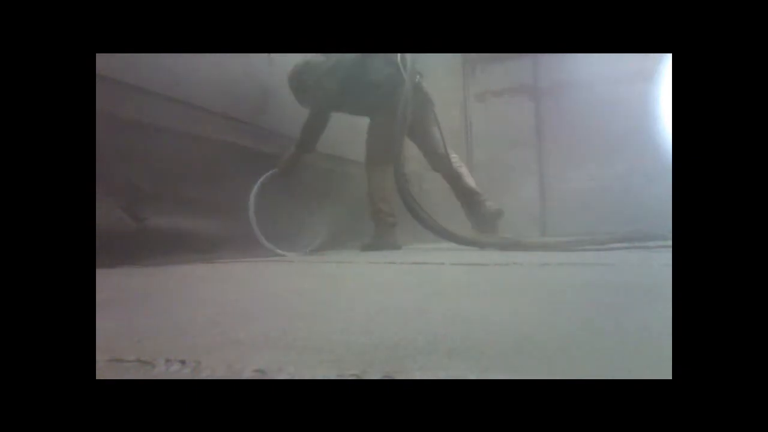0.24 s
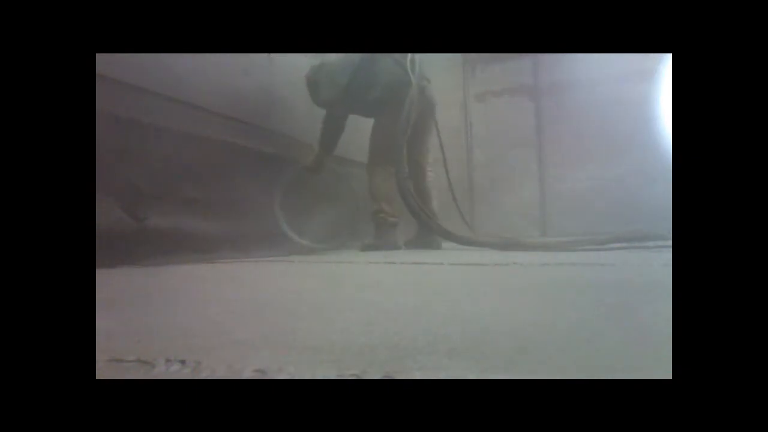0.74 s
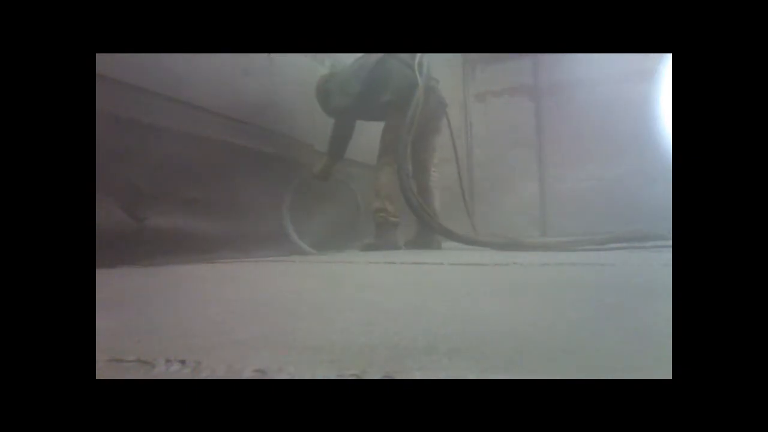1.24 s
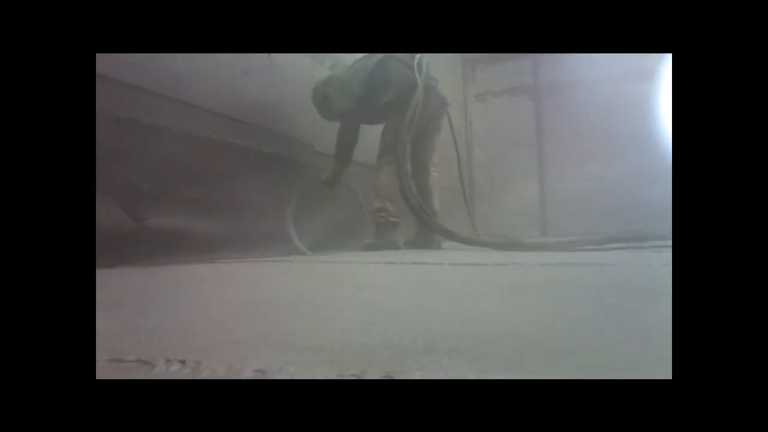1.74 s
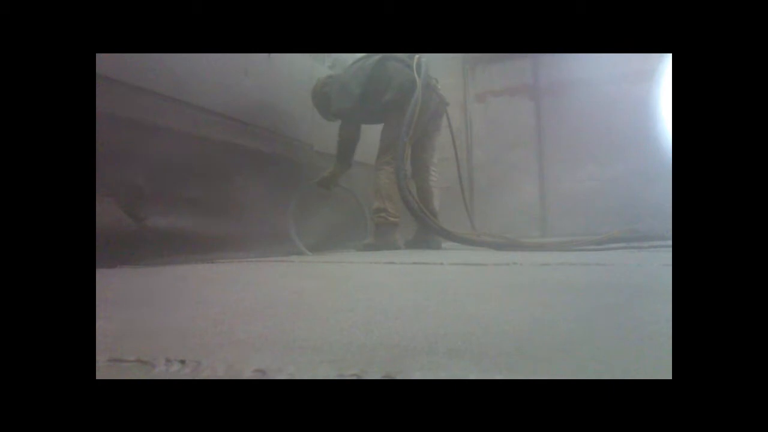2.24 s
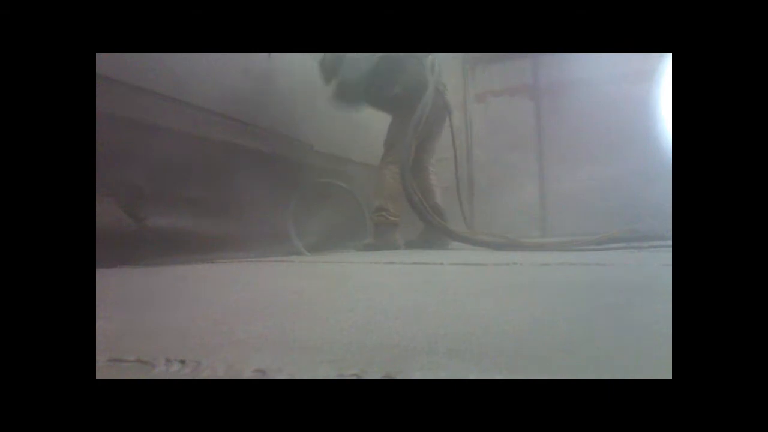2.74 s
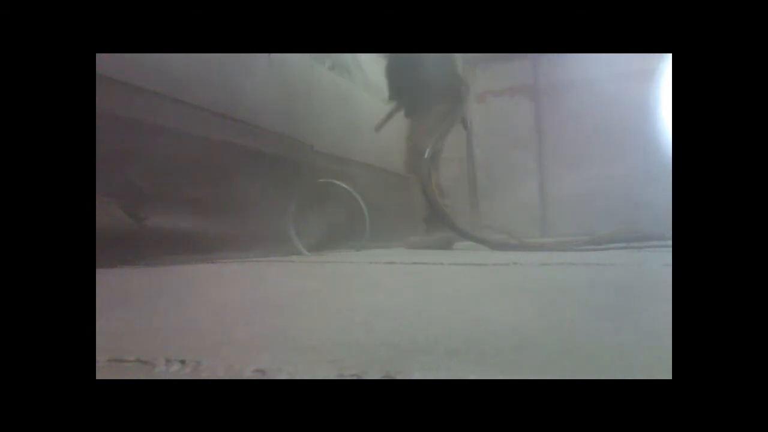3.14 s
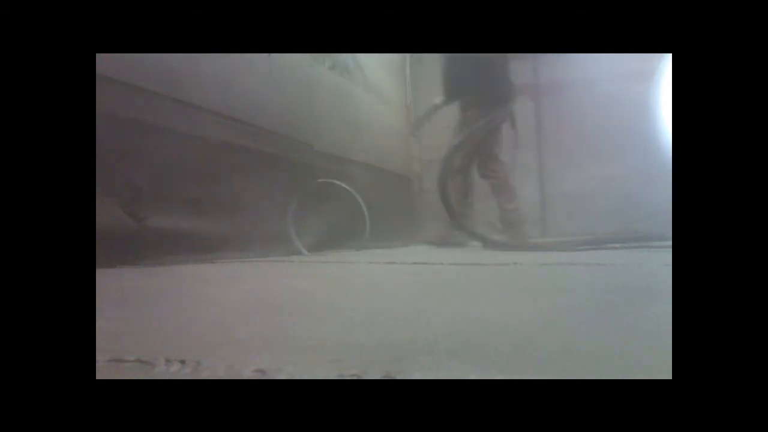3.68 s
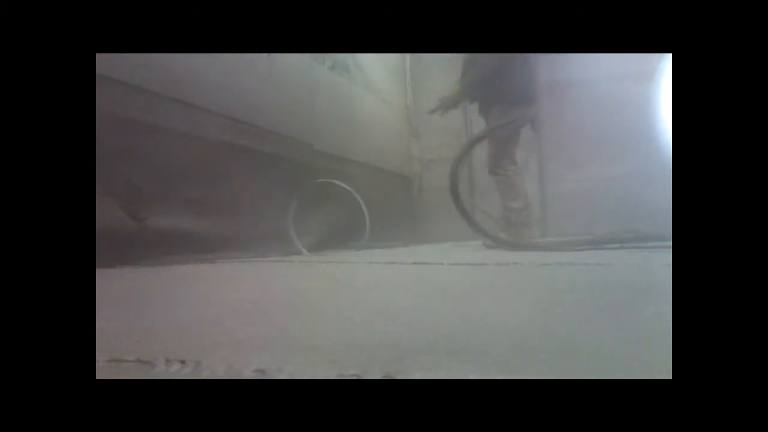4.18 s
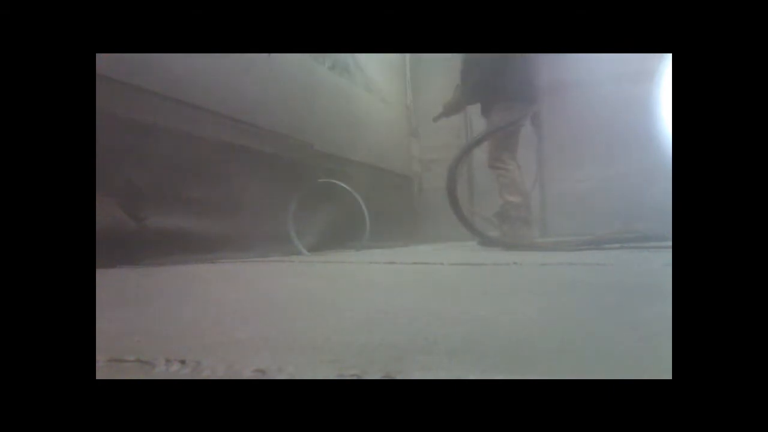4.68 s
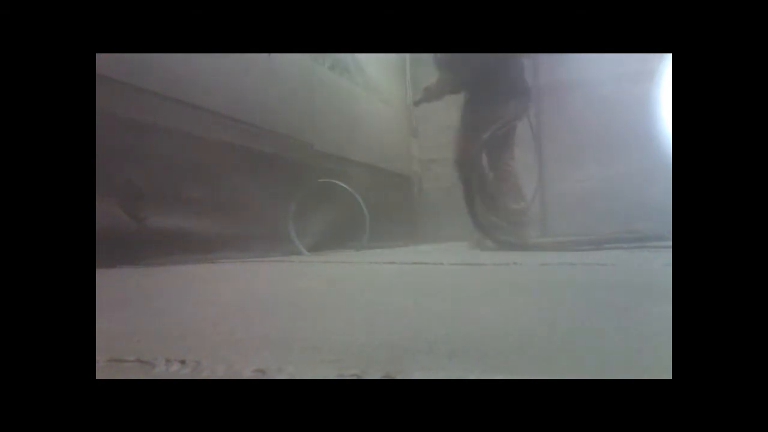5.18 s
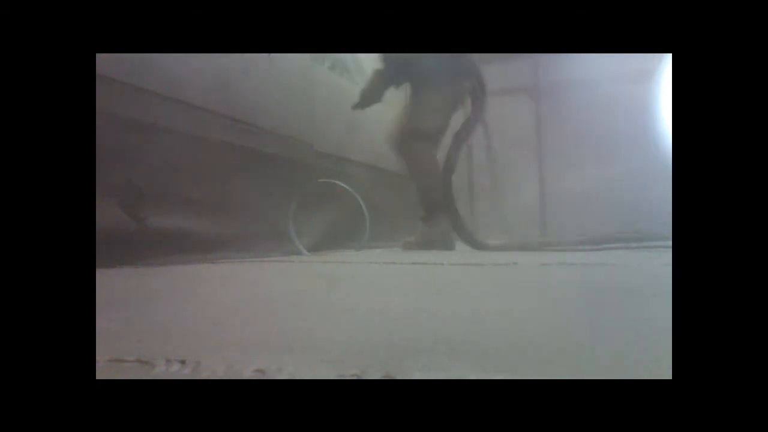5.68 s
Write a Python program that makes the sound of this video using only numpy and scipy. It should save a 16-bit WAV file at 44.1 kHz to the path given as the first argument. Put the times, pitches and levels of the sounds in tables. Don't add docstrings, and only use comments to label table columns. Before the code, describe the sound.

A loud abrasive air jet sizzles against a steel hoop, then turns away and dulls under a fluttering, droning, low blower roar.

```python
import sys
import numpy as np
from scipy import signal
from scipy.fft import rfft, irfft
from scipy.io import wavfile
from scipy.ndimage import uniform_filter1d

SR = 44100
rng = np.random.default_rng(int(sys.argv[2]) if len(sys.argv) > 2 else 0)


def makeup_ratio(level_db):
    decades = np.asarray(level_db, float) / 20
    return 10 ** decades


def store_wav(level_fs):
    pcm = np.round(np.clip(np.atleast_2d(level_fs), -1, 1) * 32767)
    wavfile.write(sys.argv[1], SR, pcm.T.astype(np.int16))


N = 261072

BLOWER_DB = -23.5


def evened(x):
    return x / np.sqrt(np.mean(x ** 2) + 1e-20)


def read(points, hz):
    f, value = np.transpose(points)
    return np.interp(np.log(hz + 1), np.log(f + 1), value)


def follow(rows, t):
    s, *columns = np.transpose(rows)
    return [np.interp(t, s, c) for c in columns]


def wander(rate_hz, t):
    coarse = t[::32]
    drift = 0
    for f in rate_hz * np.geomspace(.05, 1, 24):
        drift = drift + np.sin(2 * np.pi * (f * coarse + rng.random())) / np.sqrt(f)
    return evened(np.interp(t, coarse, drift))


def bump(t, centre_s, length_s):
    return np.exp(-.5 * ((t - centre_s) / length_s) ** 2)


def turbulence(field_db, size, patchy_db, patch_bins, patch_frames):
    frames = 4 * N // size + 5
    hz = np.fft.rfftfreq(size, 1 / SR)
    a, b, patches = rng.standard_normal((frames, len(hz), 3)).T
    patches = uniform_filter1d(patches, patch_bins, 0)
    patches = evened(uniform_filter1d(patches, patch_frames, 1))
    frame_s = np.arange(frames) * size / 4 / SR
    field = field_db(hz[:, None], frame_s) + patchy_db * patches
    spectra = (a + 1j * b) * makeup_ratio(field)
    return signal.istft(spectra, nperseg=size, noverlap=3 * size // 4)[1][:N]


def band_rms(x, lo_hz, hi_hz):
    hz = np.fft.rfftfreq(N, 1 / SR)
    band = (hz > lo_hz) & (hz < hi_hz)
    return np.sqrt(2 * np.sum(abs(rfft(x)[band]) ** 2)) / N


def blower_level(t):
    ducked_db, recover_s = -6.5, 0.36
    return BLOWER_DB + ducked_db * np.exp(-t / recover_s)


def hum_level(t):
    # top of the swell in seconds, level in dB added to the steady hum.
    swells = [
        (0.72, -44),
        (1.15, -39),
        (2.12, -36),
        (2.54, -36),
        (2.92, -39),
        (3.41, -36),
        (4.4, -33.5),
        (4.75, -35.5),
        (5.27, -32.5),
        (5.7, -30),
    ]
    rise_s, fall_s = 0.099, 0.1
    rest_db = -11
    gain = makeup_ratio(blower_level(t) + rest_db)
    for s, db in swells:
        gain = gain + makeup_ratio(db) * bump(t, s, np.where(t < s, rise_s, fall_s))
    return gain


def motor_hum(t):
    hum_hz = 118.72
    return hum_level(t) * np.sin(2 * np.pi * hum_hz * t + .12 * wander(1.7, t))


def order_level(k, over_db, emerge_s, t):
    # middle in seconds, order as a multiple of the shaft, depth in dB, half length in seconds.
    shades = [
        (1.7, 7, -3, 0.4),
        (5.57, 7, -9, 0.22),
        (1.3, 9, -2.5, 0.53),
        (3.8, 9, -6, 0.16),
        (5.22, 9, -7, 0.25),
        (2, 11, -1.5, 0.35),
        (2.45, 11, -3.5, 0.1),
        (3.4, 11, -7.5, 0.17),
        (4.6, 11, -8, 0.08),
        (5.7, 11, -9.5, 0.17),
    ]
    depth_db, emerge_length_s = -9.5, 0.1
    standing_wave_db = -0.4
    shade_db = sum(db * bump(t, s, length) for s, order, db, length in shades if round(order) == k)
    under_jet_db = depth_db / (1 + np.exp((t - emerge_s) / emerge_length_s))
    return BLOWER_DB + 3.5 + over_db + under_jet_db + shade_db + standing_wave_db * wander(2, t)


def rotor(t):
    # multiple of the shaft, level in dB over the blower.
    weak_orders = [(5, -10.5), (6, -11), (8, -11), (10, -11), (12, -17.5), (13, -17.5), (16, -13.5)]
    # multiple of the shaft, level in dB over the blower, time it emerges from the jet in seconds.
    strong_orders = [(7, -11.5, 1.0), (9, -6.5, 0.7), (11, -10, 0.34)]
    rotor_hz = 81.42
    angle = 2 * np.pi * rotor_hz * t + .015 * wander(3, t)
    weak_db = blower_level(t) - 6.0
    levels = [(k, db + weak_db + 1.5 * wander(2.5, t)) for k, db in weak_orders]
    levels += [(k, order_level(round(k), db, emerge_s, t)) for k, db, emerge_s in strong_orders]
    whine = 0
    for k, db in levels:
        phase = np.pi * k ** 2 / 8 + .2 * wander(3, t)
        whine = whine + makeup_ratio(db) * np.sin(k * angle + phase)
    return whine


def blower(t):
    # frequency in Hz, level in dB per Hz.
    roar_colour = [(12, -44.5), (30, -18.5), (76, -14.5), (113, -7), (146, -3), (335, -10.5), (390, -13),
                   (540, -10.5), (700, -10), (770, -5.5), (920, -10), (1250, -16), (2030, -25.5),
                   (2440, -34.5), (6500, -80)]
    # frequency in Hz, width in Hz, boost in dB.
    booth_modes = [(44.6, 10, 6.5), (56, 9.3, 9), (103.8, 11, 10.5), (161, 14, 4), (244.6, 33, 5),
                   (333, 4.7, 1.5)]
    # frequency in Hz, width in Hz, dip in dB.
    dead_spots = [(34, 6, -4), (111.8, 4.8, -6), (131, 9, -6.5), (180, 10, -1.5)]
    rumble_db, ducked_db, recover_s = -1.5, -3.5, 0.97

    def field_db(hz, s):
        low = np.clip((340 - hz) / 80, 0, 1)
        modes_db = 0
        for f, width, db in booth_modes + dead_spots:
            modes_db = modes_db + db / (1 + (2 * (hz - f) / width) ** 2)
        return read(roar_colour, hz) + modes_db + low * (rumble_db + ducked_db * np.exp(-s / recover_s))

    roar = turbulence(field_db, size=4096, patchy_db=0.7, patch_bins=20, patch_frames=4)
    roar = makeup_ratio(blower_level(t) - 1.5) * roar / band_rms(roar, 300, 1100)
    return roar + motor_hum(t) + rotor(t)


def striking(t):
    full_s, gone_s, stray = 0.24, 2.43, 0.092
    return np.clip((gone_s - t) / (gone_s - full_s), stray, 1)


def jet(t):
    # time in seconds, jet level in dB, fizz of the top octave in dB as the aim nears the microphone.
    nozzle = [(0, -28, 2), (0.2, -26.5, 1), (0.75, -29.5, 1), (1, -34, 0), (1.5, -34.5, -2.5),
              (1.8, -38, 0), (2.2, -40, -2), (2.7, -42.5, 1), (3.2, -43, 2.5), (3.6, -41, 2.5),
              (4.15, -40.5, 2), (4.65, -39.5, -0.5), (5.05, -41.5, 1.5), (5.17, -47.5, 1.5),
              (5.4, -46.5, -4), (5.72, -46.5, -1), (5.82, -53, -0.5), (5.92, -53, 1)]
    # frequency in Hz, level in dB per Hz.
    free_colour = [(300, -2), (900, 0), (2000, 5.5), (2370, -1), (3080, 1), (3750, -5.5), (4650, -6),
                   (6050, -4.5), (7200, -4), (9000, -7)]
    # frequency in Hz, level in dB per Hz.
    steel_colour = [(300, -13), (900, -4.5), (1830, -3), (2400, -6.5), (3200, -5), (4000, -3.5), (4800, -4),
                    (5600, -7.5), (7200, -11.5), (9000, -2.5)]
    # frequency in Hz, width in Hz, level in dB.
    steel_rings = [(1840, 40, 0), (3120, 70, 1), (3290, 18, -5), (3700, 50, -3), (4696, 30, -2),
                   (5007, 30, -2), (5227, 12, 0), (6131, 25, -3)]

    def field_db(hz, s):
        fizz_db, share = follow(nozzle, s)[1], striking(s)
        top = np.clip((hz - 4300) / 900, 0, 1)
        colour_db = share * read(steel_colour, hz) + (1 - share) * read(free_colour, hz)
        band = (hz[:, 0] > 2400) & (hz[:, 0] < 4600)
        return colour_db - colour_db[band].mean(0) + top * fizz_db

    hiss = turbulence(field_db, size=512, patchy_db=0.5, patch_bins=8, patch_frames=20)
    hiss = hiss / band_rms(hiss, 2400, 4600)
    grit, steel = rng.standard_normal(N), 0
    for hz, width, db in steel_rings:
        steel = steel + makeup_ratio(db) * evened(signal.lfilter(*signal.iirpeak(hz, hz / width, SR), grit))
    level_db = follow(nozzle, t)[0]
    slugs_db = 0.51 * wander(50, t)
    ringing = .17 + .25 * striking(t)
    return makeup_ratio(level_db + slugs_db) * (hiss + ringing * evened(steel))


def lurch(t):
    # middle in seconds, size in dB, half length in seconds.
    lurches = [(0.08, 4, 0.016), (0.393, 4.5, 0.028), (0.555, -9.5, 0.0039), (2.112, -5, 0.007),
               (0.796, 5.5, 0.0062), (0.978, 3.5, 0.0042), (1.182, -4.5, 0.0049), (1.143, 4, 0.023),
               (1.433, -4.5, 0.01), (1.54, -2.5, 0.013), (1.738, 6.5, 0.0028), (1.983, -3.5, 0.02),
               (2.057, -5.5, 0.011), (2.208, 4, 0.02), (2.417, -3.5, 0.016), (2.529, -6.5, 0.008),
               (2.935, -6, 0.007), (2.973, -4.5, 0.01), (3.036, 4, 0.015), (3.95, -9.5, 0.0027),
               (4.007, -5, 0.0087), (4.152, 4, 0.007), (4.267, -4, 0.014), (4.424, 2.5, 0.01),
               (4.472, -4, 0.007), (4.743, -4.5, 0.0098), (5.014, 5.5, 0.004), (2.303, 1, 0.0068),
               (5.542, 4.5, 0.011), (5.782, 3.5, 0.0063)]
    total_db = 0
    for s, db, length in lurches:
        falling = (t - s) * db > 0
        total_db = total_db + db * bump(t, s, length * np.where(falling, .6, 1.5))
    return total_db


def scene():
    t = np.arange(N) / SR
    hiss, drone = jet(t), blower(t)
    flutter = wander(36.04, t)
    flutter_db = 1.5 * (flutter - uniform_filter1d(flutter, size=SR // 8))
    lurch_db = lurch(t) + flutter_db
    mono = makeup_ratio(lurch_db) * hiss + makeup_ratio(0.94 * lurch_db) * drone
    return np.tile(mono, (2, 1))


def splits():
    # middle in seconds, low edge in Hz, high edge in Hz, level in dB.
    patches = [
        (.106, 5200, 6300, -34),
        (.692, 7460, 8300, -59.5),
        (4.43, 6200, 7700, -46),
    ]
    t, hz, side = np.arange(N) / SR, np.fft.rfftfreq(N, 1 / SR), 0
    for s, lo_hz, hi_hz, db in patches:
        band = (hz > lo_hz) & (hz < hi_hz)
        noise = evened(irfft(rfft(rng.standard_normal(N)) * band, N))
        side = side + makeup_ratio(db) * noise * np.exp(-((t - s) / 0.012) ** 4)
    return np.array([side, -side])


def band_limit(x):
    return signal.sosfilt(signal.butter(12, 15900, fs=SR, output="sos"), x)


def record(dry):
    # frequency in Hz, gain in dB.
    treble_cut = [(7200, 0), (7500, -8.5), (7800, -24), (8000, -35), (8240, -46), (8330, -90)]
    top_band_hz, top_lost_s = 7900, 0.78
    tick_s, tick_db = 2.0938, -28
    hz = np.fft.rfftfreq(N, 1 / SR)
    peak_db = 20 * np.log10(abs(dry[0]) + 1e-6)
    climb = np.arange(N) * 60. / SR
    held_db = np.maximum.accumulate(peak_db + climb) - climb
    held_db = uniform_filter1d(np.roll(held_db, 60), 120)
    pumped = dry * makeup_ratio(-.7 * (held_db - uniform_filter1d(held_db, 12000)))
    squeezed = 0.44 * np.tanh(pumped / .45)
    cut = irfft(rfft(squeezed) * makeup_ratio(read(treble_cut, hz)), N)
    top = irfft(rfft(cut) * (hz > top_band_hz), N)
    cut = cut - top * np.clip((np.arange(N) / SR - top_lost_s) / .02, 0, 1)
    tick = makeup_ratio(tick_db) * (np.arange(N) == round(tick_s * SR))
    offset = -.0013
    return band_limit(cut + splits() + tick + offset)


dry = scene()
out = record(dry)
store_wav(out)
```